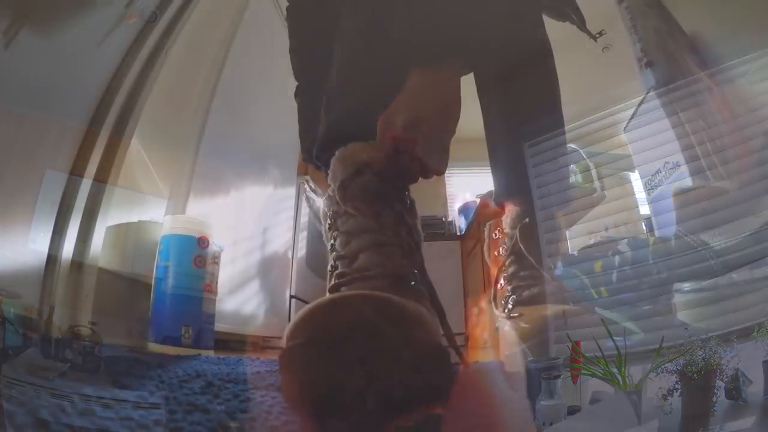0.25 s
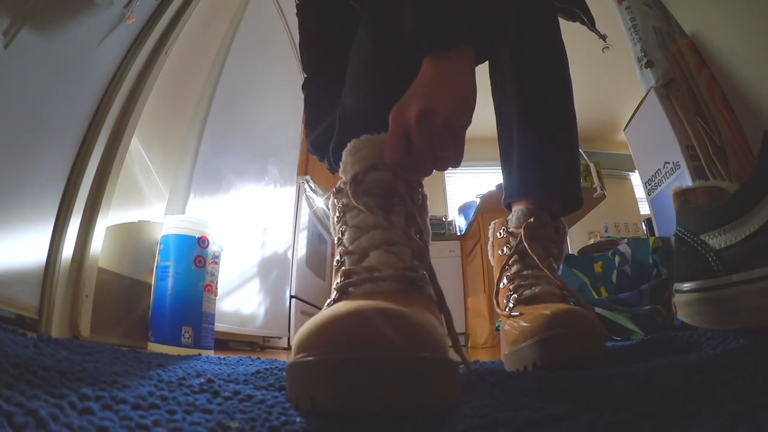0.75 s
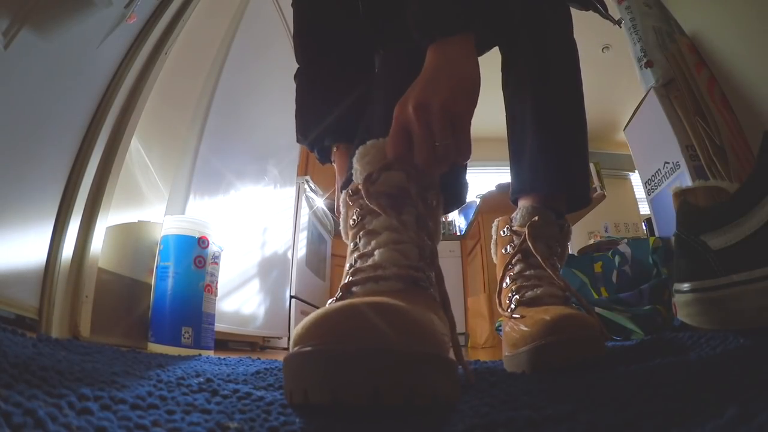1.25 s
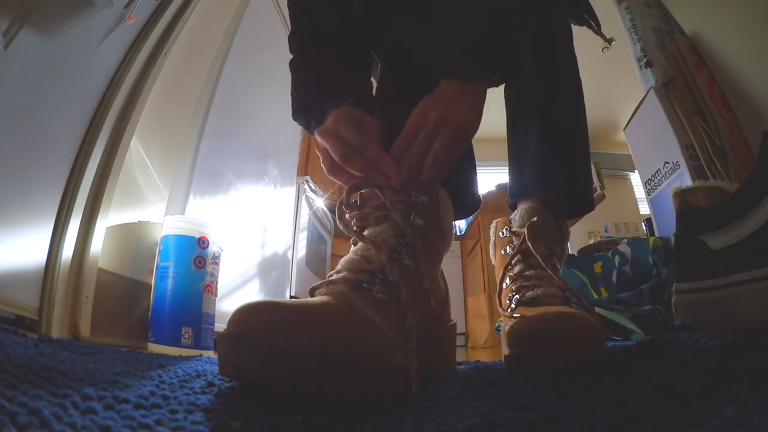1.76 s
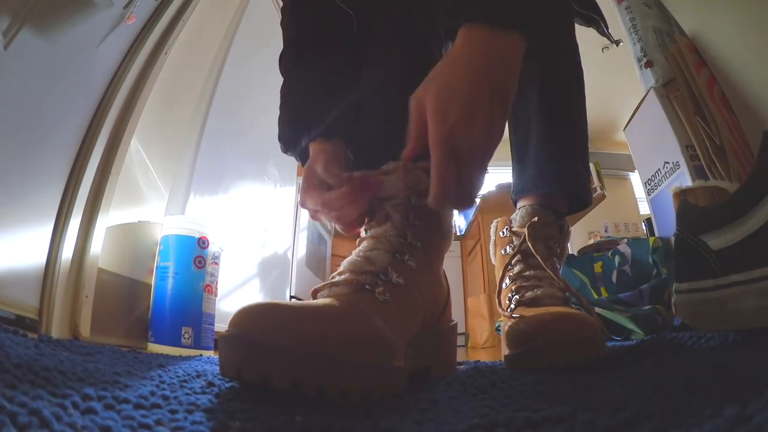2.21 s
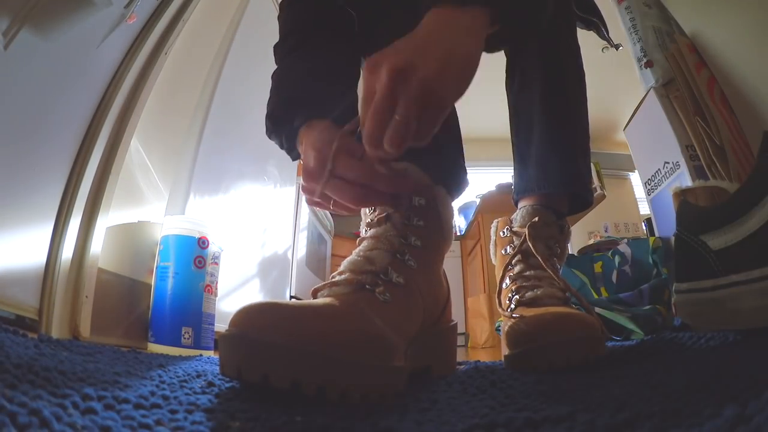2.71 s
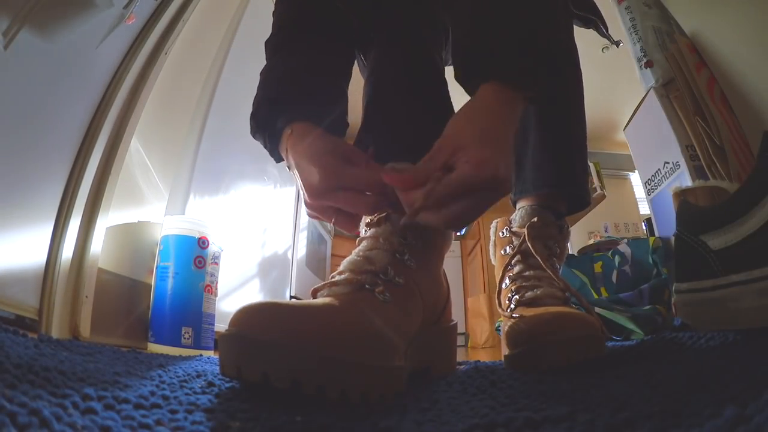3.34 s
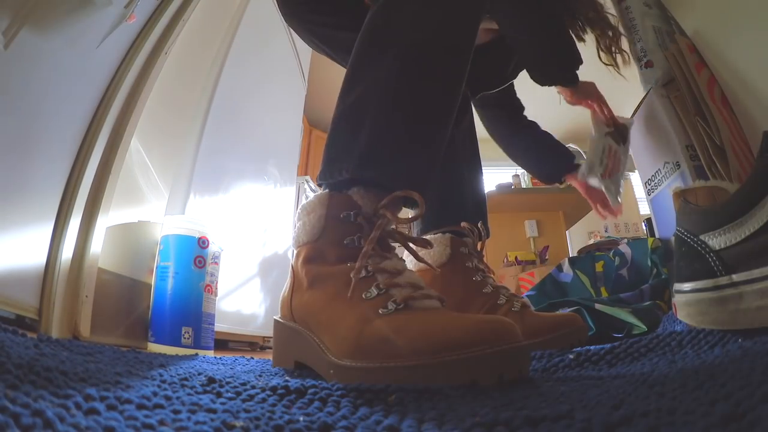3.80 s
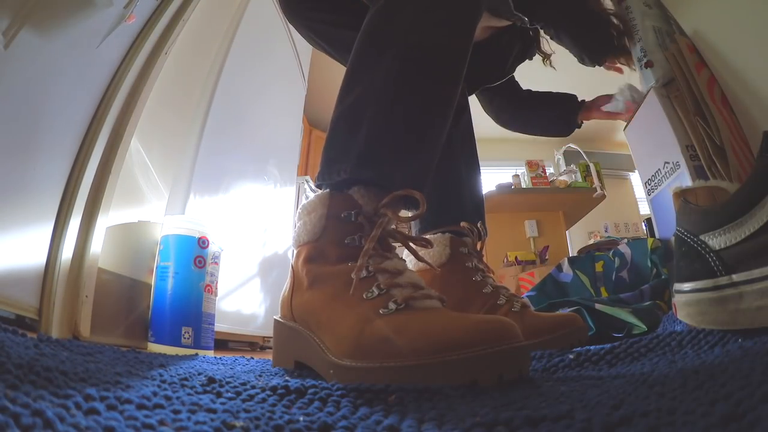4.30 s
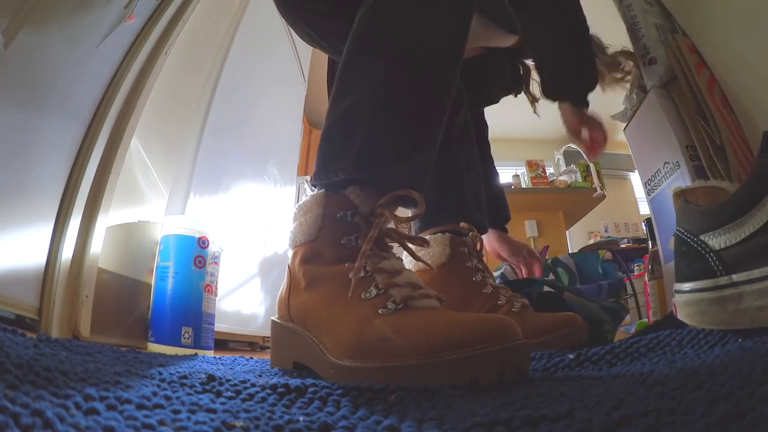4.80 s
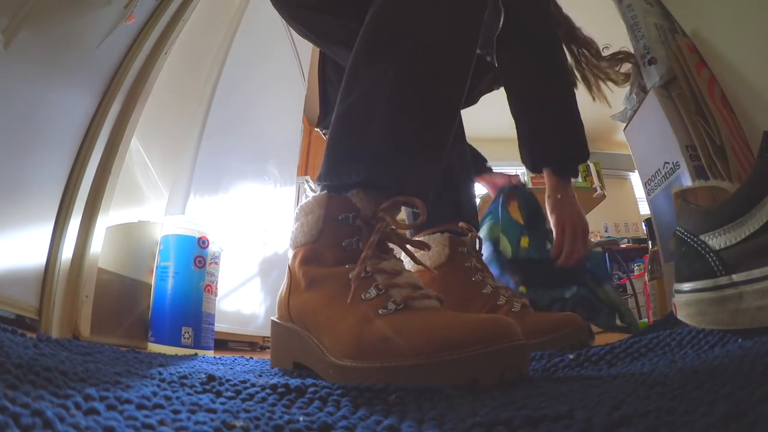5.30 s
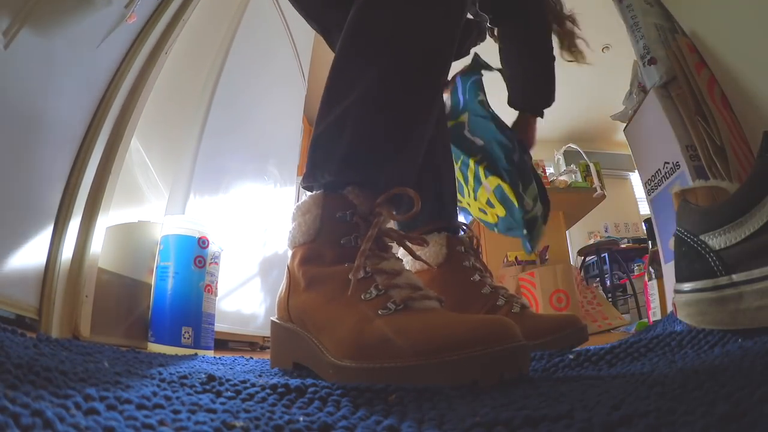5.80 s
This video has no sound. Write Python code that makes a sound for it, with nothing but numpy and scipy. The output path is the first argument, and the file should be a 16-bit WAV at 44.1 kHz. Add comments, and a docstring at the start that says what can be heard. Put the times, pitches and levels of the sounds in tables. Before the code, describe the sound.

Sleeves rustle close by as a leather boot scuffs and thuds on a rug, then a filled plastic pouch rattles and thumps onto a shelf.

```python
"""A leather boot is tightened on a rug by an entry door, heard from close by on the floor.
Sleeves rustle as fluttering noise and laces sing as narrow-band noise; the sole scuffs in grainy noise.
Thuds, knocks and a small metal jingle are damped modes; lace tips and plastic creases snap in short noise.
A filled plastic pouch rattles in two bursts of tiny contacts, the second as it thumps on a shelf.
Then a cloth bag is picked up; below it all lie soft air noise, a motor's hum and a short room echo."""
import sys
import numpy as np
from scipy import signal
from scipy.fft import rfft, irfft, next_fast_len
from scipy.io import wavfile
from scipy.ndimage import uniform_filter1d, map_coordinates

SR = 44100
rng = np.random.default_rng(int(sys.argv[2]) if len(sys.argv) > 2 else 0)


def to_wav(s):
    """Save 16-bit WAV."""
    ch = np.atleast_2d(s).T  # columns
    pcm = np.round(np.clip(ch, -1, 1) * 32767)  # PCM
    wavfile.write(sys.argv[1], SR, pcm.astype(np.int16))


N = 266893
T = np.arange(SR // 2) / SR  # time since a contact [s]

# bright spectrum of crackling plastic and of metal shimmer: (frequency [Hz], level [dB])
CRACKLE_SPECTRUM = [(1500, -8), (4500, -3.5), (6200, 2.5), (7600, 3), (9500, -3.5), (12500, -9),
                    (16000, -25)]


def amp(db):
    """Decibels to gain."""
    return 10 ** (np.asarray(db) / 20)


def unit(x):
    """x at rms 1."""
    return x / np.sqrt(np.mean(x ** 2) + 1e-20)


def along(points, hz):
    """(Hz, value) points read on a log frequency axis."""
    f, v = np.transpose(points)
    return np.interp(np.log(hz + 1), np.log(f), v)


def wobble(knots_per_s):
    """A smooth random curve through normal random knots."""
    knots = rng.standard_normal(int(N * knots_per_s / SR) + 4)
    return map_coordinates(knots, [np.arange(N) * knots_per_s / SR])


def filtered(x, response):
    """x times a response of frequency in Hz."""
    n = x.shape[-1]
    m = next_fast_len(n + SR // 2)
    return irfft(rfft(x, m) * response(np.fft.rfftfreq(m, 1 / SR)), m)[..., :n]


def add(track, start_s, sound):
    """Mix a sound into a track at start_s."""
    part = track[..., max(round(start_s * SR), 0):][..., :sound.shape[-1]]
    part += sound[..., :part.shape[-1]]


def grains(spectrum, per_s, smooth, size=N):
    """Mid and side texture of rms 1: per_s tiny contacts a second plus smooth noise, shaped by a spectrum."""
    hits = rng.random(size) < per_s / SR
    contacts = rng.uniform(-1, 1, (2, size)) * hits
    drive = unit(contacts) + smooth * rng.standard_normal((2, size))
    return unit(filtered(drive, lambda hz: amp(along(spectrum, hz))))


def swell(rise_s, t60_s):
    """An envelope that grows for rise_s and then decays exponentially."""
    return np.minimum(T / rise_s, 1) ** 2 * amp(-60 * np.maximum(T - rise_s, 0) / t60_s)


def ring(modes, scatter_db):
    """Damped modes of alternating sign, at new random strengths for each blow."""
    out = np.zeros(len(T))
    for k, (hz, db, t60_s) in enumerate(modes):
        decay = amp(db + scatter_db * rng.normal() - 60 * T / t60_s)
        out += (-1) ** k * decay * np.sin(2 * np.pi * hz * T)
    return out


def struck(modes, centre_hz, focus_db):
    """The struck spot favours modes near one pitch; focus_db is lost one octave away."""
    return [(hz, db - focus_db * np.log2(hz / centre_hz) ** 2, t60_s) for hz, db, t60_s in modes]


def fabric(moves, weave):
    """The hand speeds up and slows in each move; folds rub low and the weave hisses high, both fluttering."""
    # spectrum of rubbing folds: (frequency [Hz], level [dB])
    rub_spectrum = [(90, -35), (170, 1.5), (300, -1.5), (480, -0.5), (850, -2), (1300, -2), (1750, -6.5),
                    (2400, -8), (3200, -11), (6000, -32)]
    speed_power = 0.37  # loudness grows as this power of hand speed
    ease_s = 0.04  # averaging of the power softens starts and stops
    flutter_db, flutter_per_s = 1.7, 45  # folds catch and let go
    power = np.zeros((2, N))
    for start_s, length_s, rub_db, hiss_db in moves:
        speed = np.abs(np.sin(np.pi * np.arange(round(length_s * SR)) / (length_s * SR)))
        add(power, start_s, (amp([[rub_db], [hiss_db]]) * speed ** speed_power) ** 2)
    rub, hiss = np.sqrt(np.abs(uniform_filter1d(power, round(ease_s * SR))))
    flutter = flutter_db * wobble(flutter_per_s)
    low = rub * amp(flutter) * grains(rub_spectrum, per_s=1500, smooth=1.0)
    high = hiss * amp(flutter / 2) * grains(weave, per_s=4000, smooth=2.4)
    return low + high


def sleeves():
    """Hands tug at the boot and its laces, and the sleeve cloth rubs and hisses along."""
    # tugs: (start [s], length [s], rub level [dB], hiss level [dB])
    tugs = [(.27, .14, -49.5, -52.5), (.335, 0.073, -44, -46.5), (.4, 0.094, -45, -46.5),
            (.5, .18, -45.5, -47.5), (.68, 0.17, -44, -46), (.83, 0.51, -45.5, -45.5),
            (1.3, 0.15, -41.5, -46), (1.45, 0.21, -44.5, -45), (1.65, 0.23, -54.5, -52),
            (1.85, .18, -48.5, -45.5), (2.0, 0.18, -47.5, -42), (2.12, 0.15, -48.5, -46.5),
            (2.33, 0.068, -49.5, -47), (2.41, .27, -51, -45.5), (2.49, .1, -46, -47.5),
            (2.785, 0.16, -60, -46.5), (3.03, 0.16, -58, -49), (3.25, 0.22, -57.5, -54)]
    # spectrum of the sleeve weave: (frequency [Hz], level [dB])
    sleeve_hiss = [(1200, -5.5), (1900, -26), (2500, -2.5), (3100, -9.5), (4100, 2), (5200, 0), (6300, 1.5),
                   (8500, -5), (11700, -11), (16000, -31)]
    return fabric(tugs, sleeve_hiss)


def strokes():
    """A lace or smooth fold slides past; its irregular slips sing softly in one band."""
    # slides: (time [s], length [s], level [dB], centre [Hz], sharpness)
    slides = [(0.34, 0.063, -43.5, 800, 6.6), (1.349, 0.11, -43.5, 1870, 2),
              (2.219, 0.029, -44.5, 2200, 4.1), (2.439, 0.12, -57, 2520, 12),
              (2.782, 0.16, -51.5, 1280, 4.1), (3.06, .16, -53, 1300, 5), (4.069, 0.027, -40.5, 2550, 5.1),
              (5.119, 0.31, -48, 12000, 2.4), (5.372, 0.22, -48, 11600, 2), (5.929, 0.048, -45, 1290, 5.7)]
    out = np.zeros((2, N))
    for start_s, length_s, db, centre_hz, sharpness in slides:
        resonance = lambda hz: 1 / (1 + 1j * sharpness / 2 * (hz / centre_hz - centre_hz / (hz + 1))) ** 2
        slips = unit(filtered(rng.laplace(size=(2, len(T))), resonance))
        add(out, start_s, amp(db) * np.sin(np.pi * np.minimum(T / length_s, 1)) * slips)
    return out


def scuffs():
    """Each drag catches on many tufts of the rug."""
    # drags of sole, leather and bag: (time [s], rise [s], t60 [s], level [dB])
    drags = [(1.0, 0.057, 0.31, -27.5), (1.07, 0.019, 0.1, -25.5), (1.322, 0.012, 0.21, -35.5),
             (1.605, 0.016, 0.14, -42.5), (1.93, 0.014, 0.09, -40), (5.052, 0.026, 0.14, -38.5),
             (5.168, 0.01, 0.067, -36), (5.206, .016, .085, -36), (5.244, 0.0065, 0.081, -33),
             (5.48, 0.019, 0.078, -40.5)]
    # spectrum of the dragging: (frequency [Hz], level [dB])
    grit = [(50, -23), (160, -3), (270, -7), (600, -4), (1200, -10), (2500, -14), (5000, -17.5),
            (9000, -20), (16000, -38)]
    out = np.zeros((2, N))
    for start_s, rise_s, t60_s, db in drags:
        tufts = grains(grit, per_s=1200, smooth=1.0, size=len(T))
        add(out, start_s, amp(db) * swell(rise_s, t60_s) * tufts)
    return out


def thuds():
    """The rug softens each footfall; the boards ring briefly and the joists sway below them."""
    # weight lands: (time [s], level [dB], sway relative to that level [dB])
    footfalls = [(1.046, -33.5, -31), (1.101, -21.5, -19), (1.138, -43, -4), (1.176, -48, 5),
                 (1.516, -43, -2), (3.411, -46, -32), (4.993, -33, -22)]
    # floorboard modes: (frequency [Hz], level [dB], t60 [s])
    board_modes = [(83, -20, 0.27), (151.4, 4, 0.067), (198, -8, 0.12), (334, 7, 0.0096)]
    # joist modes: (frequency [Hz], level [dB], t60 [s])
    joist_modes = [(37.7, -6.5, 0.38), (65, 6.5, 0.11)]
    out = np.zeros(N)
    for start_s, db, sway_db in footfalls:
        sway = amp(sway_db) * ring(joist_modes, scatter_db=1)
        boards = ring(board_modes, scatter_db=1)
        soft_onset = 1 - np.exp(-T / 0.0026)
        add(out, start_s, amp(db + 6.5) * (boards + sway) * soft_onset)
    return out


def knocks():
    """The boot and handled things knock: dry, heavily damped modes with a brief noise crack."""
    # contacts: (time [s], level [dB], pitch centre [Hz])
    contacts = [(0.596, -49, 4000), (2.1067, -15.5, 1400), (2.113, -15, 680), (2.1223, -27, 1800),
                (2.229, -34, 2560), (2.452, -33, 600), (2.554, -29, 900), (3.6795, -32, 1300),
                (3.818, -34, 450), (3.8266, -22, 4020), (4.6921, -25, 1530), (4.761, -27.5, 890),
                (4.9934, -28, 596), (5.0465, -26, 1470), (5.054, -23.5, 600), (5.178, -31, 2300),
                (5.4473, -27.5, 2000), (5.961, -31, 1300), (6.033, -29, 1800)]
    # modes before focusing on the pitch centre: (frequency [Hz], level [dB], t60 [s])
    body_modes = [(292, -1.5, 0.03), (590, -2, 0.013), (910, 5, 0.005), (1200, 5.5, 0.0048),
                  (1860, -2.5, 0.0086), (2540, -5, 0.017), (5840, 4, 0.0077)]
    out = np.zeros(N)
    for start_s, db, centre_hz in contacts:
        body = ring(struck(body_modes, centre_hz, focus_db=4.0), scatter_db=0.5)
        crack = 0.41 * amp(-60 * T / 0.0068) * rng.standard_normal(len(T))
        add(out, start_s, amp(db - 1) * (body + crack))
    return filtered(out, lambda hz: 1 / (1 + (hz / 9500) ** 4))  # leather and cloth dull the crack


def crinkles(count):
    """Fingers work the pouch; lesser creases give way at random times, strengths and brightnesses."""
    from_s, to_s = 3.97, 4.17
    level_db, spread_db, centre_hz = -23, 1.5, 5500
    events = []
    for when, force, tone in rng.uniform(-1, 1, (count, 3)):
        start_s = np.interp(when, [-1, 1], [from_s, to_s])
        events.append((start_s, level_db + spread_db * force, centre_hz * 2 ** (tone / 2)))
    return events


def snaps():
    """Lace tips tick and creases snap: milliseconds of noise in one broad resonance, dulled at the top."""
    # distinct snaps: (time [s], level [dB], brightness [Hz])
    ticks = [(0.2788, -30, 11200), (0.599, -20, 3820), (1.5002, -22, 5900), (2.3376, -27, 8960),
             (3.574, -25, 4200), (3.613, -24, 6600), (3.89, -13.5, 5500), (3.959, -16.5, 7200),
             (3.9964, -24, 8300), (4.057, -20, 4430), (4.096, -14.5, 6800), (4.1003, -18, 3990),
             (4.1673, -17.5, 6040), (4.246, -18.5, 8000), (4.447, -14, 8500), (4.7185, -23.5, 8500),
             (4.759, -18.5, 7300), (5.3961, -18.5, 5730)]
    out = np.zeros((2, N))
    for start_s, db, centre_hz in ticks + crinkles(count=6):
        resonance = lambda hz: 1 / (1 + 1.1j * (hz / centre_hz - centre_hz / (hz + 1)))
        dulled = lambda hz: resonance(hz) / (1 + (hz / 13500) ** 6)
        tone = unit(filtered(rng.standard_normal((2, len(T))), dulled))
        add(out, start_s, amp(db - 10.5) * swell(0.00082, 0.012) * tone)
    return out


def jingle():
    """Small metal parts bounce on each other: a few strong partials in a dense shimmer."""
    # bounces: (time [s], level [dB])
    bounces = [(3.46, -23), (3.4621, -23), (3.463, -35.5), (3.475, -36)]
    # metal partials: (frequency [Hz], level [dB], t60 [s])
    partials = [(5270, -8, 0.094), (6460, -21, .12), (7000, -17, 0.12), (7600, -11, .12),
                (8500, -13, 0.085), (8250, -8, .15), (8495, 2, 0.099), (10700, -2, .07), (11200, 3.5, .05)]
    out = np.zeros((2, N))
    for start_s, db in bounces:
        add(out[0], start_s, amp(db - 9.5) * ring(partials, scatter_db=1.5))
        shimmer = grains(CRACKLE_SPECTRUM, per_s=12000, smooth=0.11, size=len(T))
        add(out, start_s, amp(db - 5.0 - 60 * T / 0.13) * shimmer)
    return out


def pouch():
    """Loose pieces collide in a dense swarm and crackle against the plastic skin."""
    # contents pile up: (time [s], rise [s], t60 [s], clatter level [dB], crackle level [dB])
    shakes = [(3.686, 0.0066, 0.31, -26, -46), (3.698, 0.0019, 0.32, -19, -28.5),
              (3.721, 0.0037, 0.26, -24.5, -47), (3.808, 0.0071, 0.21, -22.5, -34),
              (3.823, 0.0041, 0.25, -24, -29.5), (3.851, .025, 0.11, -56, -36),
              (4.29, 0.024, 0.098, -17.5, -16.5), (4.316, 0.019, 0.32, -14.5, -26.5)]
    # spectrum of the colliding pieces: (frequency [Hz], level [dB])
    clatter = [(90, -27), (240, -4.5), (400, 1), (520, -5.5), (660, -0.5), (850, -4), (1250, -3.5),
               (1700, -6.5), (3000, -9), (4200, -6.5), (5500, -14), (10000, -20.5), (16000, -39)]
    clump_db, clumps_per_s = 1.8, 220  # pieces arrive in clumps
    out = np.zeros((2, N))
    for start_s, rise_s, t60_s, clatter_db, crackle_db in shakes:
        pieces = amp(clatter_db) * grains(clatter, per_s=1300, smooth=0.5, size=len(T))
        skin = amp(crackle_db) * grains(CRACKLE_SPECTRUM, per_s=2000, smooth=0.6, size=len(T))
        add(out, start_s, swell(rise_s, t60_s) * (pieces + skin))
    return out * amp(clump_db * wobble(clumps_per_s))


def shelf():
    """The pouch lands: a hard edge excites the panel's upper modes, the soft bulk its low ones."""
    # blows: (time [s], level [dB], pitch centre [Hz])
    blows = [(4.304, -15, 1210), (4.3153, -11.5, 170), (4.3215, -6.5, 600), (4.3239, -4, 1490),
             (4.335, -6, 147), (4.346, -4, 199), (4.347, -11, 460), (4.4, -32, 890)]
    # panel modes, t60 before the cap: (frequency [Hz], level [dB], t60 [s])
    panel_modes = [(93.6, -6.5, 0.28), (162, -1.5, 0.13), (216, 3.5, 0.14), (276, -13.5, 0.28),
                   (338, -0.5, 0.1), (430, 2.5, 0.15), (485, 2, 0.28), (539.5, 6, 0.13), (624, 7, 0.053),
                   (678.4, 0.5, 0.3), (1090, 2.5, 0.13), (1228, -1, 0.091), (1304, 1, 0.1),
                   (1357, -7, 0.14), (1504, -9, 0.26), (1665, -16, 0.18), (1920, -3.5, 0.12),
                   (2280, -8, .13)]
    max_t60_s = 0.19  # longest ring of any panel mode
    out = np.zeros((2, N))
    capped = [(hz, db, min(t60_s, max_t60_s)) for hz, db, t60_s in panel_modes]
    for start_s, db, centre_hz in blows:
        panel = ring(struck(capped, centre_hz, focus_db=10), scatter_db=1)
        blow = amp(db - 7.5) * panel * (1 - np.exp(-T / 0.00058))
        add(out[0], start_s, blow)
        side_delay_s = rng.uniform(0.00093, 0.00302)  # the side follows, by a random delay for each blow
        add(out[1], start_s + side_delay_s, amp(-6) * blow)
    return out


def bag():
    """The pouch and then the bag are turned in the hands, rubbing and hissing as cloth."""
    # turns: (start [s], length [s], rub level [dB], hiss level [dB])
    turns = [(3.45, 0.28, -48, -51.5), (3.91, 0.21, -45, -55), (4.06, .15, -42, -46.5),
             (4.49, 0.31, -56.5, -51), (4.71, 0.46, -45.5, -48.5), (5.14, 0.25, -40, -45.5),
             (5.38, 0.18, -41, -44), (5.55, 0.12, -42.5, -44.5), (5.66, 0.23, -45.5, -47),
             (5.9, 0.16, -44, -49.5)]
    # spectrum of the hiss: (frequency [Hz], level [dB])
    bag_hiss = [(1200, -3.5), (2800, -9.5), (3900, 5.5), (6500, 2.5), (8700, 0), (12000, -7.5),
                (16000, -37)]
    return fabric(turns, bag_hiss)


def still_room():
    """Soft air noise and the hum of an appliance motor, wavering in pitch and level."""
    # air noise spectrum: (frequency [Hz], level [dB])
    air_spectrum = [(15, -57), (25, -55), (53, -12.5), (102, -8.5), (326, -5), (394, -8.5), (460, -8),
                    (677, -10), (775, -11), (1700, -13.5), (2050, -16), (2480, -14.5), (16000, -27.5)]
    # motor partials: (frequency [Hz], level [dB])
    hum_partials = [(96.9, -65), (290.7, -70), (387.6, -58)]
    noise = rng.standard_normal((2, N))
    air = amp(-51) * unit(filtered(noise, lambda hz: amp(along(air_spectrum, hz))))
    clock_s = np.cumsum(1 + 0.002 * wobble(10)) / SR
    for hz, db in hum_partials:
        air[0] += amp(db + 1.5 * wobble(7)) * np.sin(2 * np.pi * hz * clock_s)
    return air


def hallway(x):
    """Mid and side echo of the near walls: a noise tail in which each frequency dies at its own speed."""
    # echo decay: (frequency [Hz], t60 [s])
    decay = [(100, 0.33), (400, 0.32), (2000, 0.3), (7000, 0.25), (14000, 0.056)]
    hz, t, z = signal.stft(rng.standard_normal((2, SR // 2)), SR, nperseg=256)
    tail = signal.istft(z * amp(-60 * t / along(decay, hz)[:, None]), SR)[1]
    delay = round(0.003 * SR)
    tail = np.pad(tail / np.linalg.norm(tail[0]), ((0, 0), (delay, 0)))
    return signal.fftconvolve(x[None], tail, axes=1)[:, :N]


def scene():
    """Direct thuds and knocks are centred; boot sounds are narrowest near 4 kHz, farther ones in the bass."""
    # side gain at the boot: (frequency [Hz], level [dB])
    near_width = [(150, -17), (380, -11.5), (700, -8), (2400, -5.5), (4400, -47), (8000, -20),
                  (13000, -6.5)]
    # side gain further off: (frequency [Hz], level [dB])
    far_width = [(60, -16), (120, -19), (240, -17), (480, -10), (950, -6.5), (1890, -3), (3770, -6),
                 (7520, -5), (15000, -6)]
    thud, knock, snap, thump = thuds(), knocks(), snaps(), shelf()
    metal, rattle = jingle(), pouch()
    send = amp(-14) * thud + amp(-12.5) * knock + amp(-2) * snap[0]
    send += amp(-11) * thump[0] + amp(-11.5) * metal[0] + amp(-17) * rattle[0]
    near = sleeves() + scuffs() + strokes()
    far = bag() + snap + metal + rattle + thump + still_room() + hallway(send)
    mid = near[0] + far[0] + thud + knock
    near_side = filtered(near[1], lambda hz: amp(along(near_width, hz)))
    far_side = filtered(far[1], lambda hz: amp(along(far_width, hz)))
    side = near_side + far_side
    return np.array([amp(-0.25) * (mid + side), amp(-0.6) * (mid - side)])


def record(dry):
    """A high-pass drops the deepest bass, peaks clip at full scale and a steep band limit follows."""
    top_hz = 16100
    sound = signal.sosfilt(signal.butter(2, 28, "highpass", fs=SR, output="sos"), dry)
    return filtered(np.clip(sound, -1, 1), lambda hz: hz < top_hz)


dry = scene()
out = record(dry)
to_wav(out)
```